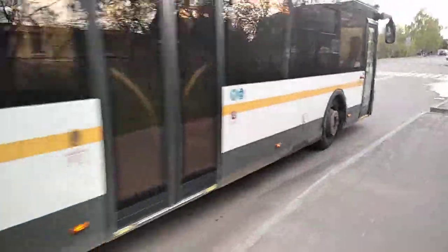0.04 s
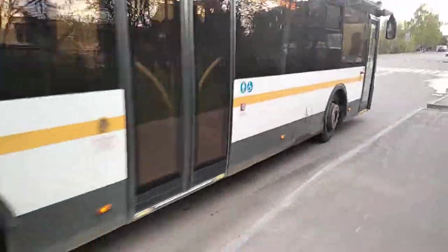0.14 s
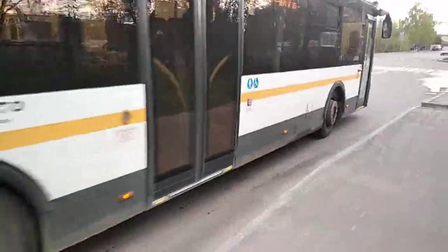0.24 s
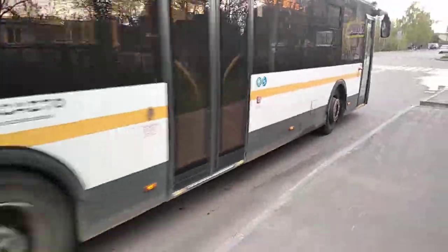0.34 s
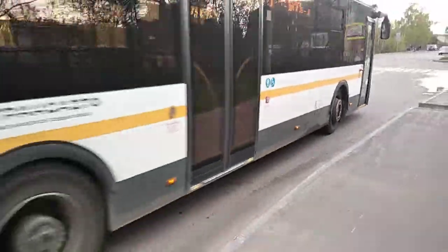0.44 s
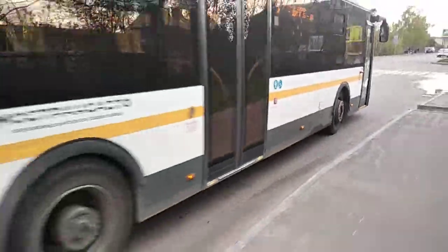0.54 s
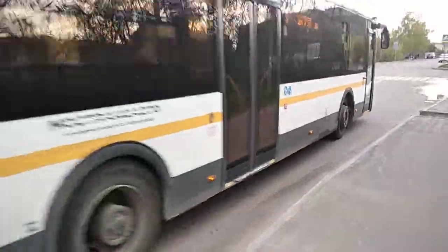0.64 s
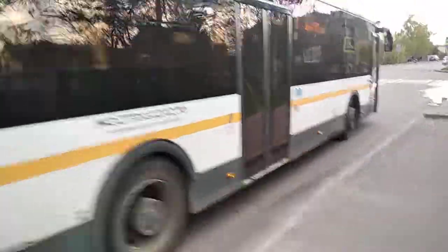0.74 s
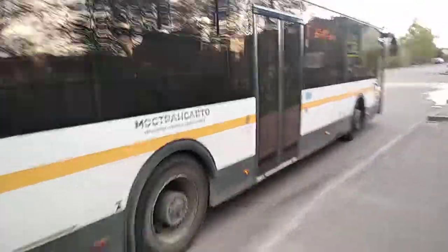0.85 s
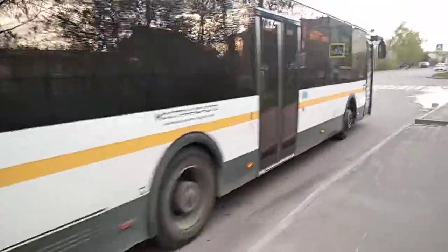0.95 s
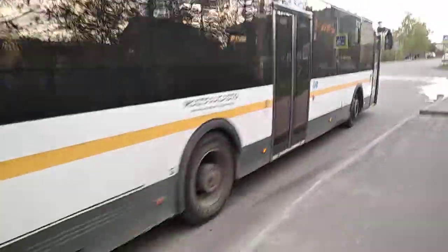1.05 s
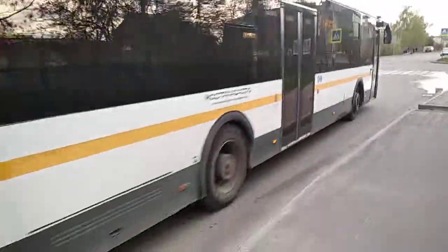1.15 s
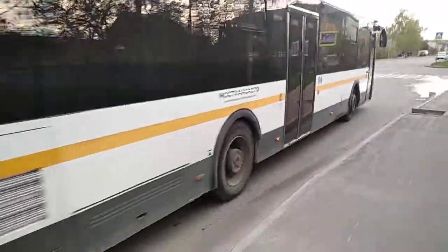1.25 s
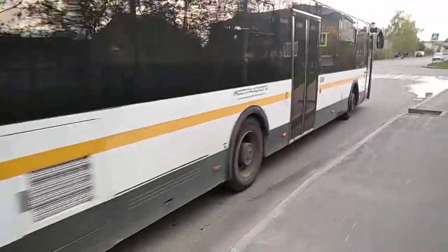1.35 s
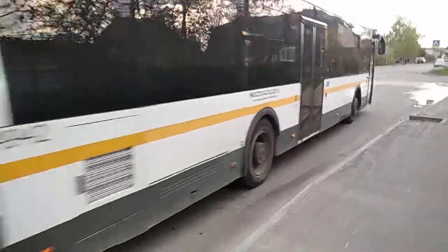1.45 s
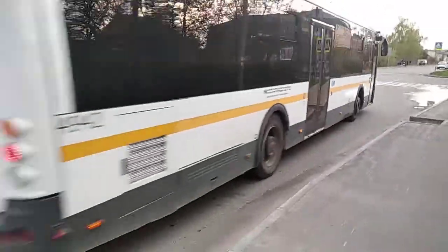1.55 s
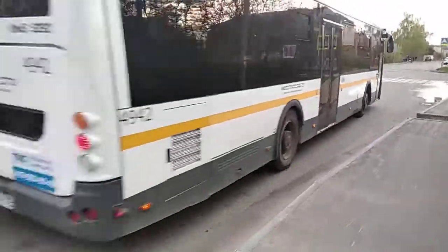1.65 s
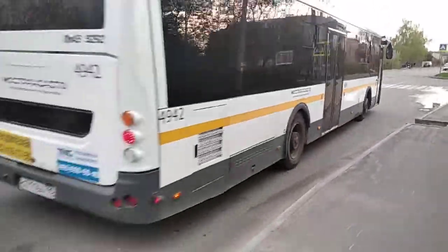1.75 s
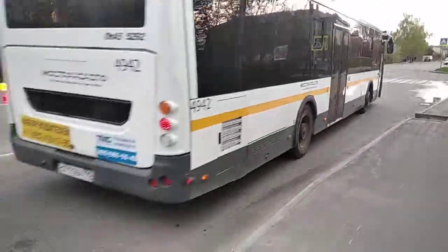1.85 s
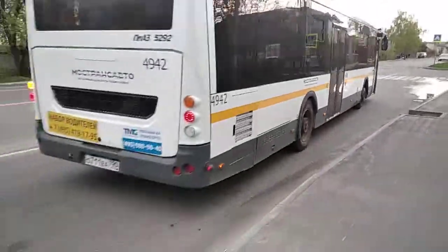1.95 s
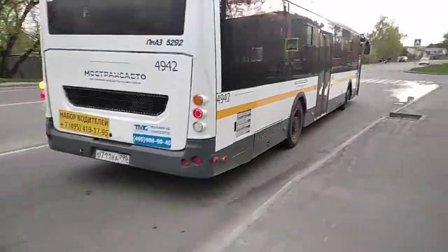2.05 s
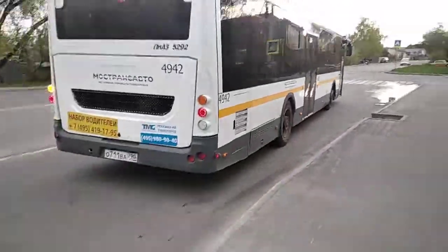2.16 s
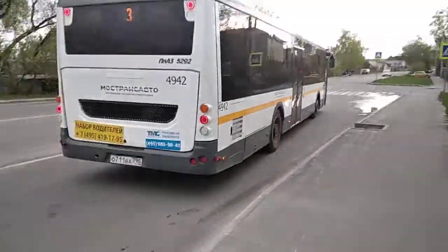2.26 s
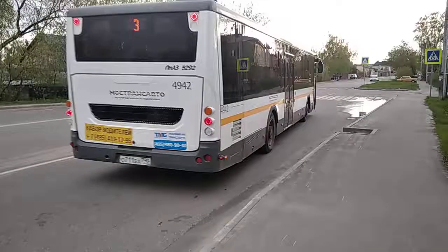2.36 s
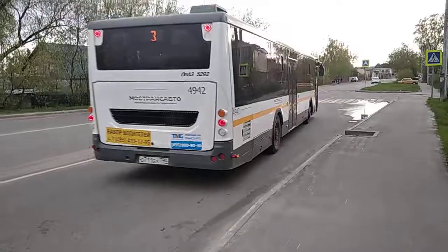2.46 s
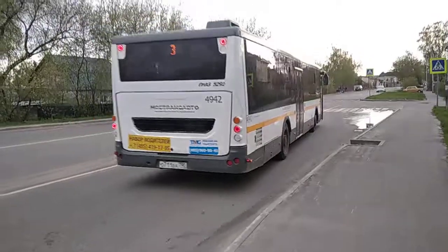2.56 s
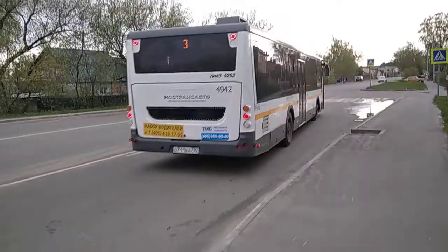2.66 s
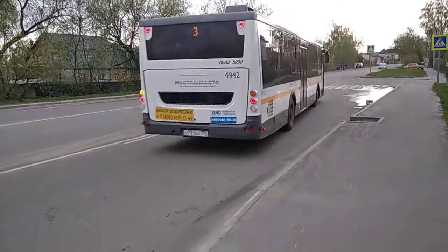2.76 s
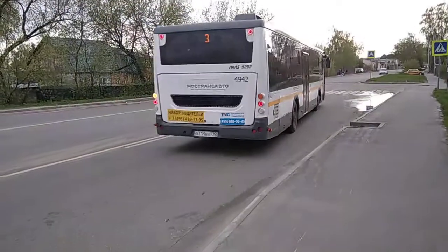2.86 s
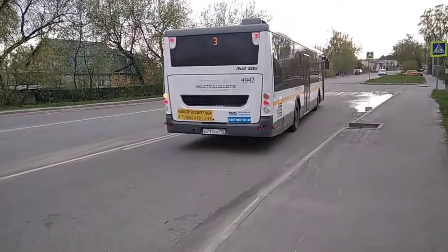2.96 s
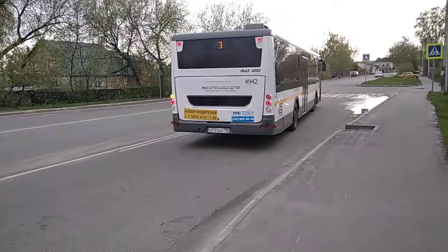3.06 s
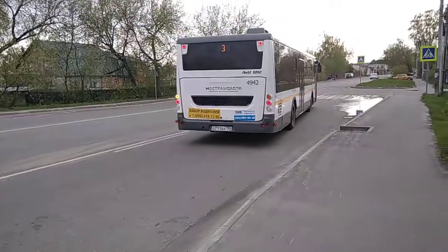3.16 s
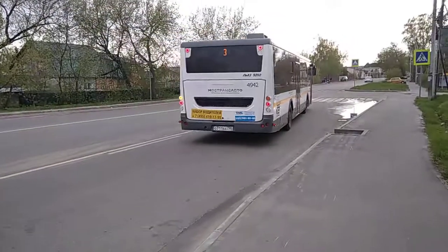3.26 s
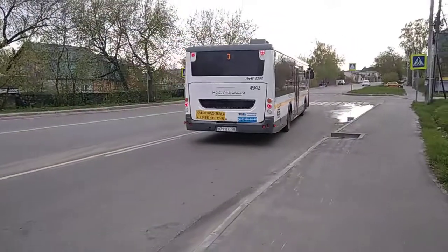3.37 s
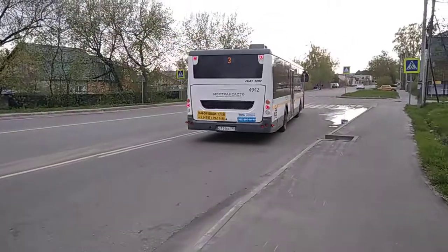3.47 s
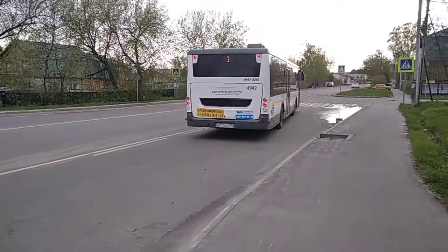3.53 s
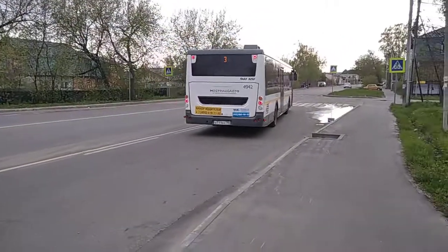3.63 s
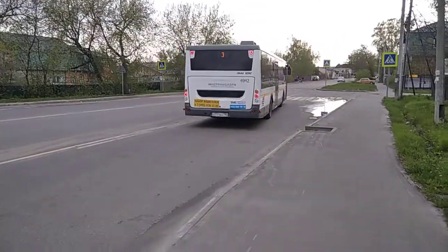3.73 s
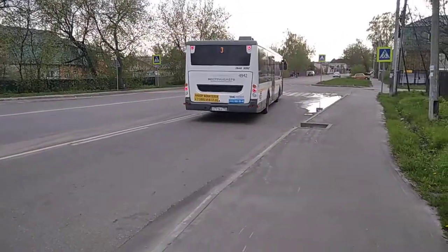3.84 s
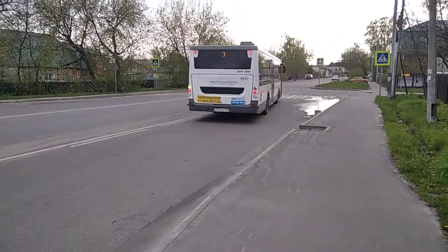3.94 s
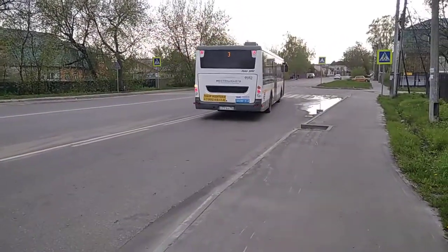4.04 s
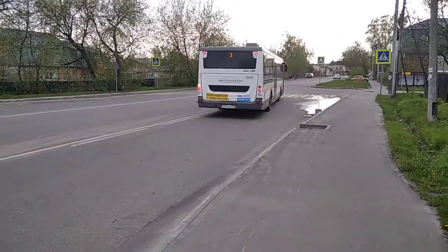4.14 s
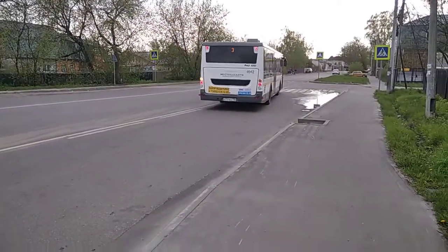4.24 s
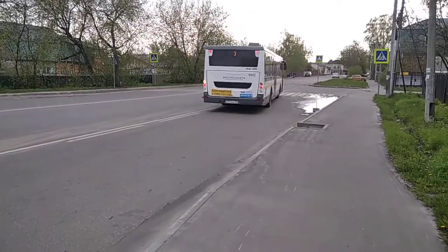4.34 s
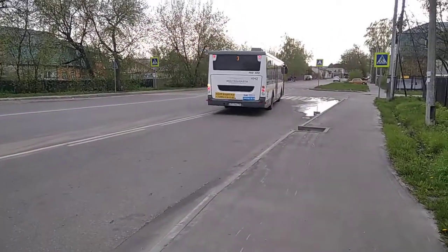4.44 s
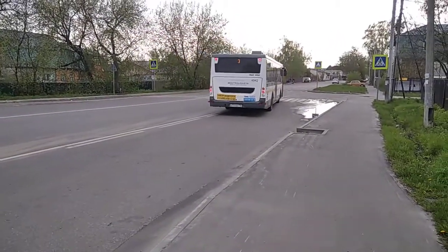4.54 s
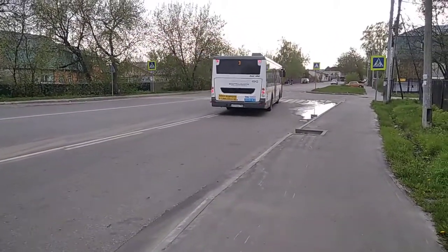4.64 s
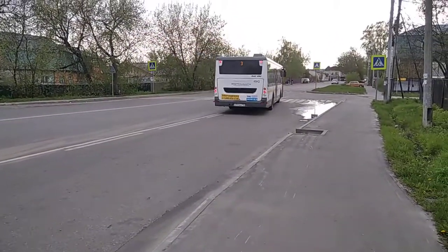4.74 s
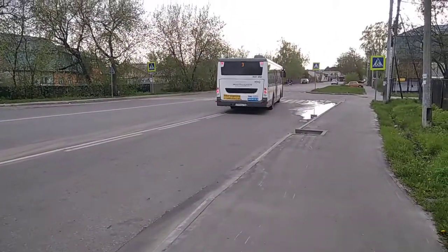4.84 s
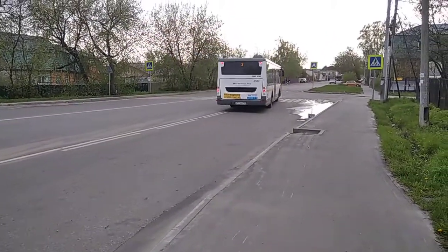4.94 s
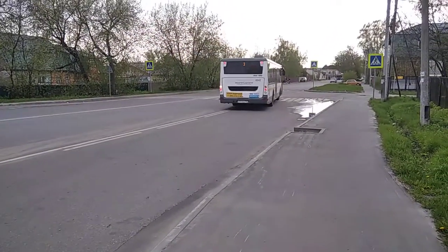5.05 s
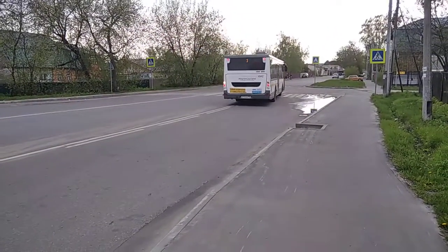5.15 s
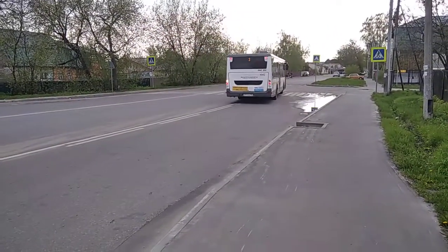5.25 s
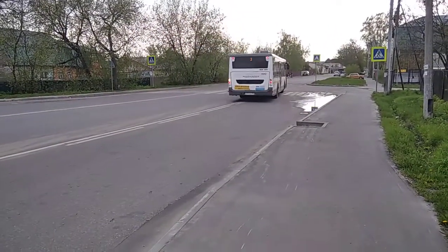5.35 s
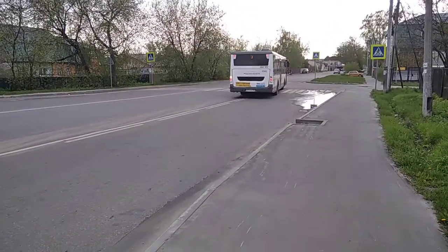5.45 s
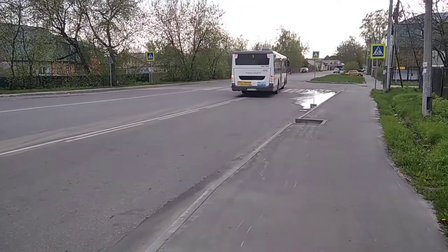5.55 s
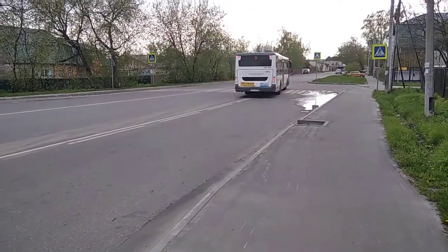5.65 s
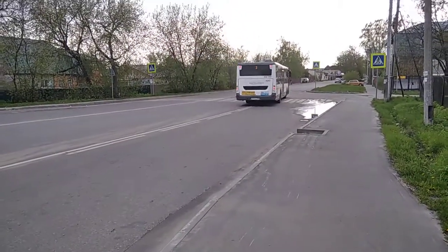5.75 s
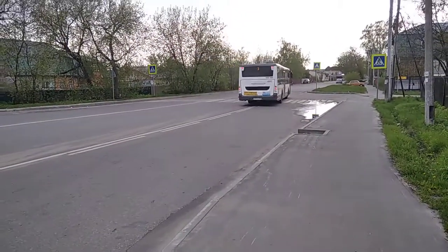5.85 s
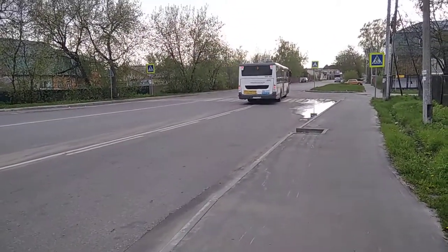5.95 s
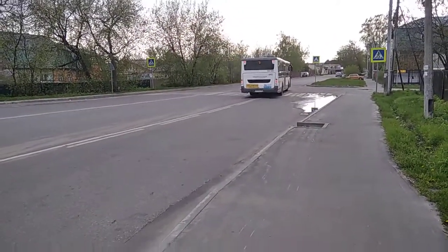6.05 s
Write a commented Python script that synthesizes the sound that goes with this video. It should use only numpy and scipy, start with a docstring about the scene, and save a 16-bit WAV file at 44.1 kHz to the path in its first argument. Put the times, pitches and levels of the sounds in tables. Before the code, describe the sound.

A diesel city bus is already pulling away under load, heard in stereo from the kerb about five metres off. A deep, steady exhaust boom dominates, rising slightly in pitch over the first two seconds. A rising gear moan peaks at about 0.8 seconds, with thin drive whines and a fuzzy, high turbo whistle climbing around 1 second. At about 1.8 seconds the rear engine passes: rumble, clatter, a droning cooling fan and hissing turbo air are at their fullest. The bus then recedes, somewhat to the left, fading gradually with faint high whines. At about 5.1 seconds the throttle closes, the boom and hiss sink, and the revs fall towards idle. Two small clicks sound close to the microphone, a faint tick at 5.3 seconds and a clearer one at 5.7. Far traffic murmurs faintly throughout, to the end at about 6 seconds.

```python
"""At the kerb, a stereo microphone about 5 m from the path of a diesel city bus that is pulling away.
It comes on with the exhaust booming, the turbo whistling up, the gears moaning and the drive whining.
At 1.8 s the rear engine is abreast: the block clatters, the cooling fan drones, the turbo's air hisses.
The bus recedes; at 5.1 s the throttle closes, boom and hiss sink and the revs fall towards idle.
Two small close clicks follow, the last ringing the microphone's ports. Far traffic murmurs throughout."""
import sys
import numpy as np
from scipy import signal
from scipy.fft import rfft, irfft, next_fast_len
from scipy.io import wavfile
from scipy.ndimage import uniform_filter1d, map_coordinates

SR = 44100
rng = np.random.default_rng(int(sys.argv[2]) if len(sys.argv) > 2 else 0)


def master_out(mix):
    """Clip the mix to full scale and print it as 16-bit PCM to the path in sys.argv[1]."""
    frames = np.transpose(np.atleast_2d(mix))
    ceiling = np.clip(frames, -1, 1)
    pcm = np.round(ceiling * 32767).astype(np.int16)
    wavfile.write(sys.argv[1], SR, pcm)


N = 269010
TIME = np.arange(N) / SR

# Engine revs, held under load, then dropping to idle: time_s, firing_hz
REVS = [(0.0, 52.1), (0.07, 54.4), (0.19, 54.67), (2.21, 60.09), (2.8, 58.8), (3.5, 58), (4.3, 56.15),
        (4.94, 52.83), (5.2, 46.06), (5.4, 38.2), (5.71, 33.8), (6.1, 31.8)]
# Exhaust boom along the street, before the throttle's cut: time_s, level_db
BOOM_LEVEL = [(0.0, -25.5), (0.18, -25.5), (2.12, -29), (2.8, -33), (3.0, -36.5), (3.49, -34.5),
              (4.26, -40.5), (4.66, -35.5), (5.1, -45.5)]
# Engine rumble beside the bus and as it recedes: freq_hz, relative_db
RUMBLE_NEAR = [(20, -25), (45, -3), (90, 2.5), (130, 0), (190, -0.5), (300, -2.5), (400, -5), (480, -9.5),
               (600, -27.5), (900, -35)]
RUMBLE_TAIL = [(20, -19), (45, 0), (85, 2.5), (130, 3), (190, -0.5), (290, 0.5), (350, -5.5), (430, -9.5),
               (550, -19.5), (900, -47)]
# Clatter and hiss beside the bus's flank and engine bay: freq_hz, relative_db
CLATTER_FLANK = [(300, -22), (460, -1), (600, -1), (740, 0.5), (860, -4), (1050, 0.5), (1300, -5.5),
                 (1700, -5), (2200, -7.5), (2700, -9), (3500, -13.5), (4200, -10), (5200, -15),
                 (6000, -12.5), (7500, -20), (9500, -42)]
CLATTER_BAY = [(300, -8.5), (460, 0), (600, -2), (900, -1.5), (1090, -3), (1270, -7.5), (1600, -5),
               (2000, -9), (2900, -10.5), (3400, -11.5), (4300, -11.5), (5200, -17.5), (7500, -25),
               (9500, -47)]
HISS_NEAR = [(3000, -13.5), (6000, -7), (7500, -7), (8400, -3.5), (9300, -2), (10100, -4.5), (11200, -8.5),
             (12500, -12), (14300, -14.5)]
# Clatter and hiss of the receding bus, coloured by the microphone's port resonances: freq_hz, relative_db
CLATTER_TAIL = [(350, -19), (530, -6), (700, 0.5), (1090, -1), (1290, -11.5), (1480, -6.5), (1720, -6.5),
                (1980, -9), (2270, -8), (2850, -16), (3350, -9), (3650, -15.5), (4050, -6), (4600, -12),
                (5500, -15.5), (6100, -26), (9000, -49)]
HISS_TAIL = [(3000, -12.5), (6100, -6), (6900, -5), (7100, 1.5), (7400, -3), (8400, 0), (9300, 0),
             (10100, -2), (11200, -9.5), (12500, -13.5), (14300, -13)]
# Whines of the drive: start_s, end_s, start_hz, end_hz, level_db, width_hz, roughness
DRIVE_WHINES = [(.26, 0.583, 2115, 2130, -55, 29, 0.54), (0.684, 1.245, 2116, 2133, -50.5, 30.2, 0.54),
                (0.089, 1.498, 3140, 3245, -59.5, 90.3, 0.72), (0.301, .9, 6000, 5930, -71, 89, 1.5),
                (1.999, 2.9, 3410, 3357, -59.5, 130, 2.2), (3.601, 6.1, 4007, 4087, -78, 260, 3),
                (3.85, 4.6, 5470, 5560, -65, 482, 3.1)]
# Clicks by the microphone: start_s, level_db, tick_share
CLOSE_CLICKS = [(5.279, -52, 1), (5.692, -39.5, 0)]
# Resonances of the microphone's ports, rung by a click: pitch_hz, relative_db, t60_s
MIC_PORT_MODES = [(920, -4, 0.016), (1660, 2, 0.014), (2330, -20, 0.0085), (4100, -11, .007),
                  (7080, -11, 0.014)]
# Spectrum of distant traffic: freq_hz, relative_db
TRAFFIC_SPECTRUM = [(40, -14), (90, -14.5), (260, 1.5), (420, -17.5), (750, -12.5), (1100, -13.5),
                    (1320, -24), (1720, -15.5), (2800, -32), (4050, -52), (6000, -29), (9400, -28),
                    (12000, -41)]
# Likeness of left and right for near and far sound: freq_hz, correlation
ALIKE_NEAR = [(60, 1), (290, 1), (630, 0.99), (1500, 0.67), (2400, 0.29), (3400, 0), (6000, 0),
              (9000, 0.082)]
ALIKE_FAR = [(60, 1), (290, 1), (630, 0.89), (1050, 0.96), (1400, 0.25), (3000, 0.31), (5500, 0.31),
             (7500, 0.044)]
# The bus's bearing at the microphone: time_s, left_minus_right_db, left_lag_ms
BUS_BEARING = [(0, -2, 0.45), (1.55, 6, 0.26), (2.2, 10, 0.044), (3.3, 5, 0.012), (4.2, 5.5, -.01),
               (6.1, 14, -0.2)]
# Shading by the microphone's housing, which scales that balance: freq_hz, balance_factor
HOUSING_SHADOW = [(200, 0), (700, 0.23), (1300, 0.59), (2400, .3), (4300, 0.27), (8000, 0.66),
                  (14000, 1.53)]

PASS_S, SPEED_M_PER_S, ACCEL_M_PER_S2, ABREAST_M = 1.807, 3.68, 1, 4.88  # as the engine passes
BAY_FROM_M, BAY_TO_M, TURN_M = -1.05, 2.8, 1.87  # where the bay faces the kerb; length of a view change
FULL_FIRING_HZ = 60
LIFT_S, LIFT_FALL_S, LIFT_DB = 5.1, 0.24, -6.5  # the closing throttle cuts boom and hiss


def exhaust(firing_phase):
    """The silencer lets through the firing tone and little else; uneven cylinders add a half order."""
    boom_db = curves(BOOM_LEVEL)[0] + LIFT_DB * throttle_closed() + 0.28 * wobble(14)
    half_order = amp(-33.5) * tone(1.5 * firing_phase, rough=0.66, width_hz=6.4)
    octave = amp(-43) * tone(2 * firing_phase, rough=0.72, width_hz=5)
    return amp(boom_db) * (tone(firing_phase, rough=0.062, width_hz=45) + half_order + octave)


def knocks(firing_phase, depth, scatter_db):
    """Gain that peaks at every firing; the six cylinders differ, and so does each stroke."""
    stroke = (firing_phase / (2 * np.pi)).astype(int)
    cylinders = rng.standard_normal(6)
    size_db = scatter_db * (cylinders[stroke % 6] + rng.standard_normal(1000)[stroke])
    pulse = np.abs(np.sin(firing_phase / 2)) ** 1.3
    return unit(1 + depth * amp(size_db) * pulse)


def engine_block(firing_hz, road_m):
    """Combustion shakes the block and panels; the colour turns as flank, engine bay and tail go by."""
    flank, bay, tail = facing(road_m)
    rumble = amp(3) * (np.hypot(flank, bay) * rush(RUMBLE_NEAR, ALIKE_NEAR)
                       + tail * rush(RUMBLE_TAIL, ALIKE_FAR))
    clatter = (flank * amp(0.74) * rush(CLATTER_FLANK, ALIKE_NEAR)
               + bay * amp(0.9) * rush(CLATTER_BAY, ALIKE_NEAR)
               + tail * amp(-0.8) * rush(CLATTER_TAIL, ALIKE_FAR))
    rumble *= knocks(angle(firing_hz), depth=0.33, scatter_db=-1.5)
    clatter *= knocks(angle(firing_hz), depth=0.05, scatter_db=6.5)
    rumble *= pass_gain(road_m, firing_hz, distance_power=0.77, revs_power=1.4)
    clatter *= pass_gain(road_m, firing_hz, distance_power=0.96, revs_power=1.37)
    return amp(-40) * rumble + amp(-42.5) * clatter


def cooling_fan(firing_hz, road_m):
    """The fan slips behind the engine's speed and sounds mostly out of the rear grille."""
    views = facing(road_m - 0.63)  # the grille trails the engine
    blade_hz = 214.9 * (firing_hz / FULL_FIRING_HZ) ** 0.88
    phase = angle(blade_hz)
    # each tone has its own level from flank, bay and tail
    blade = amp([-9.5, 0.9, 2]) @ views * tone(phase, rough=0.064, width_hz=20)
    fifth = amp([-9, -9.5, -10.5]) @ views * tone(1.5 * phase, rough=0.61, width_hz=20)
    octave = amp([-10, -4.5, -16.5]) @ views * tone(2 * phase, rough=0.3, width_hz=18)
    gain = amp(-39.5) * pass_gain(road_m, firing_hz, distance_power=0.69, revs_power=4.5)
    return gain * (blade + fifth + octave)


def turbo(firing_hz, road_m, spool_s=1.64, loudest_s=1):
    """Air rushes through the turbo while it is on boost; its fuzzy whistle climbs as it spools up."""
    flank, bay, tail = facing(road_m)
    boost = np.clip(TIME / spool_s, 0, 1)
    air = (np.hypot(flank, bay) * amp(-2) * rush(HISS_NEAR, ALIKE_NEAR)
           + tail * amp(-6) * rush(HISS_TAIL, ALIKE_FAR))
    air *= pass_gain(road_m, firing_hz, distance_power=1.04, revs_power=1.15)
    whistle_hz = np.interp(boost, [0, 1], [7560, 9540])
    whistle_db = -52.5 - 7 * ((TIME - loudest_s) / 0.4) ** 2
    whistle = np.array([tone(angle(whistle_hz), rough=2.33, width_hz=320) for side in range(2)])
    flutter_db = 0.31 * wobble(11) + 0.47 * wobble(45)
    throttle_db = -8 * (1 - boost) ** 2 + LIFT_DB * throttle_closed()
    return amp(-42 + throttle_db + flutter_db) * air + amp(whistle_db) * whistle


def drive(axle_s=0.81, rise_db_per_s=15, fall_db_per_s=44):
    """The gears moan, loudest as the driven axle passes; thin whines and hisses swell and fade."""
    t = TIME - axle_s
    gear_hz = 366.7 + 150 * t
    gear_db = -42.5 - np.maximum(-rise_db_per_s * t, fall_db_per_s * t)
    gear_db += 2.5 * np.exp(-(t / 0.033) ** 2)  # brief swell with the wheel abreast
    out = amp(gear_db) * tone(angle(gear_hz), rough=0.38, width_hz=40)
    for start_s, end_s, start_hz, end_hz, level_db, width_hz, rough in DRIVE_WHINES:
        progress = np.clip((TIME - start_s) / (end_s - start_s), 0, 1)
        swell = np.sqrt(np.abs(np.sin(np.pi * progress)))
        pitch_hz = start_hz + (end_hz - start_hz) * progress
        out += amp(level_db) * swell * tone(angle(pitch_hz), rough, width_hz)
    return out


def close_clicks():
    """Small clicks close by, a little left: a bright tick, or a short ring of the microphone's ports."""
    out, t = np.zeros(N + SR), np.arange(SR // 20) / SR
    ring = sum(amp(db - 60 * t / t60) * np.sin(2 * np.pi * hz * t) for hz, db, t60 in MIC_PORT_MODES)
    for start_s, level_db, tick_share in CLOSE_CLICKS:
        tick = np.diff(rng.standard_normal(len(t) + 1)) * amp(-60 * t / 0.013)
        click = (1 - tick_share) * ring + tick_share * tick
        out[round(start_s * SR):][:len(t)] += amp(level_db) * click
    return out[:N] * amp([[2.5], [-2.5]])


def distant_traffic():
    """Far-off traffic merges into a steady murmur."""
    return amp(-56) * rush(TRAFFIC_SPECTRUM, ALIKE_FAR)


def at_microphone(bus, patchy_db=1, ripple_db=2.84):
    """Sound reaches the two ports at different times, and the housing shades the treble."""
    hz, t, spectra = signal.stft(bus, SR, nperseg=1024)
    hz = hz[:, None]
    time_s, balance_db, lag_ms = np.transpose(BUS_BEARING)
    lean_db = along(HOUSING_SHADOW, hz) * np.interp(t, time_s, balance_db)
    sides = amp(np.array([lean_db, -lean_db]) / 2)
    sides /= np.sqrt(np.mean(sides ** 2, axis=0))
    half_lag = np.exp(-1j * np.pi * hz * np.interp(t, time_s, lag_ms) / 1000)
    # broad patches differ left and right; fine ripples from road and fence reflections reach both
    patches = mottle(spectra.shape, bins=8, frames=16)
    ripples = mottle(spectra.shape[1:], bins=2, frames=60)
    colour_db = (patchy_db * patches + ripple_db * ripples) * hz / (hz + 500)
    spectra *= sides * amp(colour_db) * np.array([half_lag, half_lag.conj()])
    return signal.istft(spectra, SR, nperseg=1024)[1][:, :N]


def facing(road_m):
    """Gains of the flank, engine bay and tail as they face the microphone in turn."""
    past_flank = np.clip(0.5 + (road_m - BAY_FROM_M) / TURN_M, 0, 1)
    past_bay = np.clip(0.5 + (road_m - BAY_TO_M) / TURN_M, 0, 1)
    return np.sqrt([1 - past_flank, past_flank * (1 - past_bay), past_flank * past_bay])


def pass_gain(road_m, firing_hz, distance_power, revs_power):
    """Gain that falls with distance and rises with revs; 1 when abreast at full revs."""
    distance_ratio = np.hypot(road_m, ABREAST_M) / ABREAST_M
    return (firing_hz / FULL_FIRING_HZ) ** revs_power / distance_ratio ** distance_power


def throttle_closed():
    """How far the throttle has closed, 0-1."""
    return np.clip((TIME - LIFT_S) / LIFT_FALL_S, 0, 1)


def rush(spectrum, alike):
    """Coloured stereo noise whose middle has rms 1."""
    def mid_side_gains(hz):
        spread = np.arccos(np.clip(along(alike, hz), -1, 1)) / 2
        return amp(along(spectrum, hz)) * np.array([np.cos(spread), np.sin(spread)])
    mid, side = filtered(rng.standard_normal((2, N)), mid_side_gains)
    return np.array([mid + side, mid - side]) / np.std(mid)


def tone(phase, rough, width_hz):
    """A tone with a skirt of narrow noise, rms 1."""
    in_phase = (1 + rough * wobble(width_hz)) * np.sin(phase)
    return unit(in_phase + rough * wobble(width_hz) * np.cos(phase))


def mottle(shape, bins, frames):
    """A random pattern of rms 1, smoothed over frequency and time."""
    bands = uniform_filter1d(rng.standard_normal(shape), bins, axis=-2)
    return unit(uniform_filter1d(bands, frames, axis=-1))


def wobble(rate):
    """A smooth random curve, rate knots a second."""
    return map_coordinates(rng.standard_normal(4096), [TIME * rate], mode="mirror")


def filtered(x, response):
    """x shaped by a frequency response."""
    size = next_fast_len(N + SR // 2)
    return irfft(rfft(x, size) * response(np.fft.rfftfreq(size, 1 / SR)), size)[..., :N]


def along(points, hz):
    """Interpolate (freq_hz, value) points on a log axis."""
    freq_hz, values = np.transpose(points)
    return np.interp(np.log(hz + 1), np.log(freq_hz + 1), values)


def curves(rows):
    """One value per sample for each column after the time."""
    time_s, *columns = np.transpose(rows)
    return [np.interp(TIME, time_s, column) for column in columns]


def angle(hz):
    """Running phase of a changing frequency."""
    return 2 * np.pi * np.cumsum(hz) / SR


def amp(db):
    """Decibels to gain."""
    return 10 ** (np.asarray(db) / 20)


def unit(x):
    """Scale to rms 1."""
    return x / np.sqrt(np.mean(x ** 2) + 1e-20)


def scene():
    """From the kerb: the bus gathers speed evenly, with clicks close by and traffic far off."""
    firing_hz, = curves(REVS)
    t = TIME - PASS_S
    road_m = SPEED_M_PER_S * t + ACCEL_M_PER_S2 * t ** 2 / 2  # engine's travel past the microphone
    bus = (exhaust(angle(firing_hz)) + cooling_fan(firing_hz, road_m)
           + engine_block(firing_hz, road_m) + turbo(firing_hz, road_m) + drive())
    return at_microphone(bus) + close_clicks() + distant_traffic()


def record(dry, top_hz=14250):
    """The microphone keeps nothing above its band limit."""
    return filtered(dry, lambda hz: hz < top_hz)


dry = scene()
out = record(dry)
master_out(out)
```